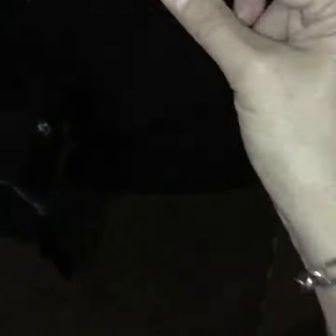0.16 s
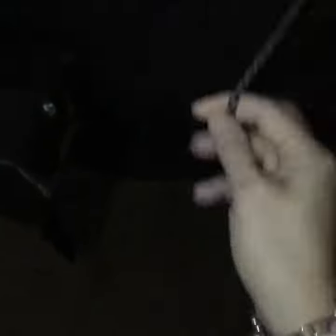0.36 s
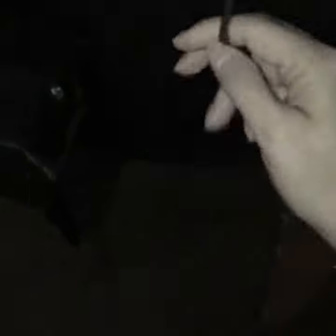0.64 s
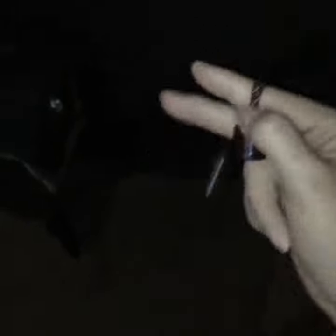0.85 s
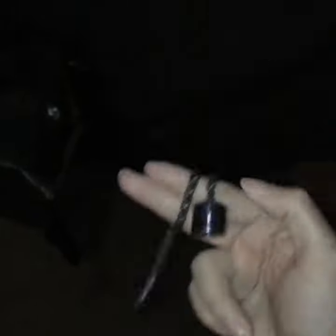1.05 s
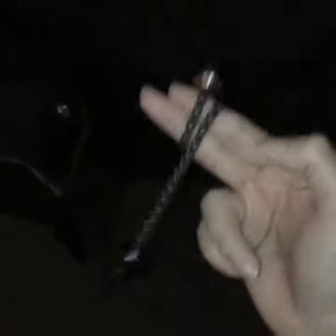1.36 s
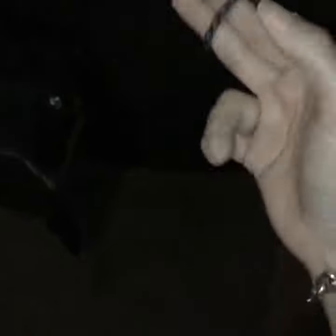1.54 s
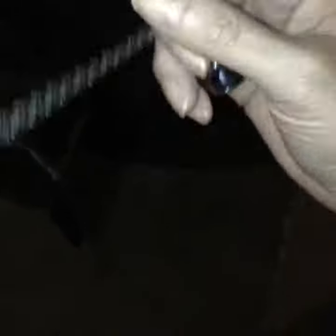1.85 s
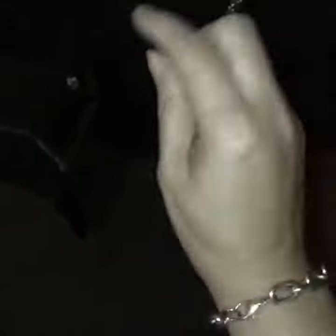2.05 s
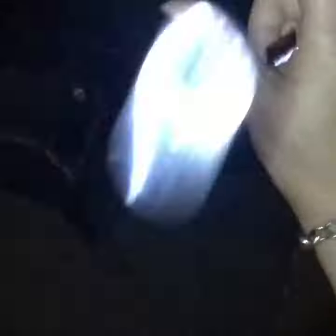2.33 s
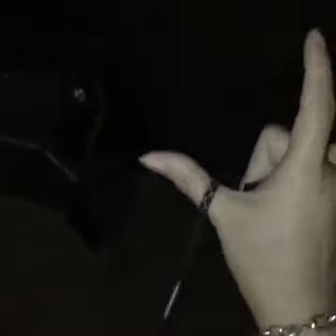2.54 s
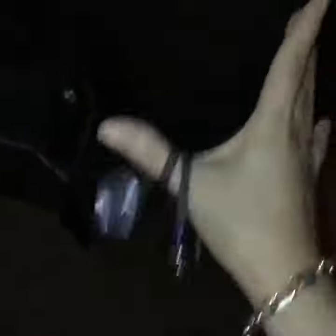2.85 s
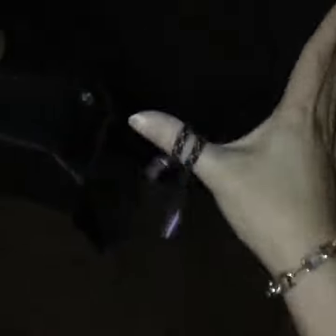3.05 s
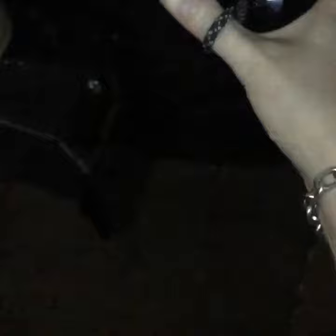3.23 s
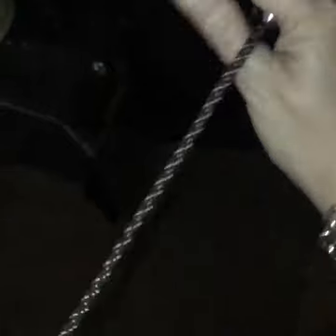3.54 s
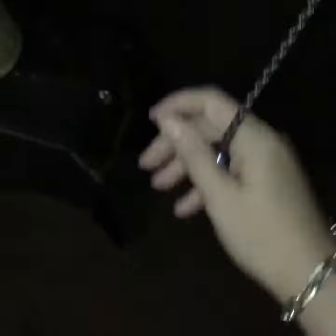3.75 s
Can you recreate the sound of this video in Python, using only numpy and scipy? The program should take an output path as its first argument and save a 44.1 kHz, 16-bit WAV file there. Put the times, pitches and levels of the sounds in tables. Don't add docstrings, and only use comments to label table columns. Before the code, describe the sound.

Two metal beads on a cord clack sharply once amid tiny ticks and rustles, fan droning

```python
import sys
import numpy as np
from scipy import signal
from scipy.fft import rfft, irfft, next_fast_len
from scipy.io import wavfile
from scipy.ndimage import uniform_filter1d

SR = 44100
rng = np.random.default_rng(int(sys.argv[2]) if len(sys.argv) > 2 else 0)


def linear_from_db(decibels):
    return 10 ** (np.asarray(decibels, float) / 20)


def generate_wav(sig):
    pcm = np.round(np.clip(np.atleast_2d(sig).T, -1, 1) * 32767).astype(np.int16)
    wavfile.write(sys.argv[1], SR, pcm)


N = 171549


def rms_one(x):
    return x / np.sqrt(np.mean(x ** 2) + 1e-20)


def butter(x, hz, kind, order=2):
    sos = signal.butter(order, np.clip(hz, 20, .45 * SR), kind, fs=SR, output="sos")
    return signal.sosfilt(sos, x)


def add(out, s, sound):
    i = max(int(s * SR), 0)
    out[i:i + len(sound)] += sound[:N - i]


def at_hz(points, hz):
    f, db = np.transpose(points)
    return np.interp(np.log(hz), np.log(f), db)


def shaped(power):
    size = next_fast_len(N)
    hz = np.arange(size // 2 + 1) * SR / size + 1e-3
    spectrum = rfft(rng.standard_normal(size))
    return irfft(spectrum * np.sqrt(power(hz) * SR / 2), size)[:N]


def wander(step_s, points, size):
    return np.interp(np.arange(size) / SR, np.arange(points) * step_s, rng.standard_normal(points))


# (frequency [Hz], level [dB per Hz])
RUSH = [(40, -108), (110, -81.5), (300, -70.5), (700, -83), (1500, -91), (2400, -91), (2700, -112),
        (3700, -136)]
# (frequency [Hz], level [dB per Hz])
AIR = [(2700, -112), (3300, -115), (3700, -118.5), (4200, -119), (6000, -123), (9600, -127), (12000, -131),
       (16000, -135)]
# (frequency [Hz], width [Hz], level [dB per Hz])
DRONES = [(60, 10, -89.5), (89.7, 6.9, -75), (163.9, 12, -61.5), (240.5, 14, -66.5), (272.6, 24, -62.5),
          (324, 18, -64), (484, 10, -75), (686, 34, -79), (2122.4, 46, -73), (2198, 150, -84.5),
          (2444, 67, -92), (2888, 102, -96), (3148, 170, -110)]
WHINES = [(828, 3.9, -81.5), (950, 15, -84), (1021, 18, -82.5), (1150, 14, -84), (1220, 20, -84),
          (1347, 10, -83.5), (1653, 36, -83.5), (2322, 14, -83)]
HIGH_WHINES = [(4580, 350, -116.5), (9650, 250, -122)]


def fan():
    sway_db, sway_step_s = 0.95, 1 / 8

    def power(hz):
        rush = linear_from_db(2 * at_hz([(11, -128)] + RUSH + [(6000, -150)], hz))
        air = linear_from_db(2 * at_hz(AIR, hz)) * (hz > 2000)
        peaks = sum(linear_from_db(2 * db) / (1 + (2 * (hz - f) / width) ** 2) ** 2
                    for f, width, db in DRONES + WHINES + HIGH_WHINES)
        return rush + air + peaks

    return shaped(power) * linear_from_db(sway_db * wander(sway_step_s, 40, N))


def swell(size):
    peak_share = .42
    ramp = np.interp(np.arange(size) / size, [0, peak_share, 1], [0, 1, 0])
    return np.sin(np.pi / 2 * ramp) ** 2


# (start [s], length [s], level [dB], pitch [Hz])
SWISHES = [(0.001, .2, -89.5, 5440), (1.166, 0.11, -76, 5320), (2.087, 0.052, -74.5, 6270),
           (2.092, 0.037, -78.5, 7800), (0.434, 0.057, -87.5, 5800), (1.523, 0.041, -85, 5100),
           (1.53, 0.032, -86.5, 7840), (1.856, 0.027, -85.5, 6740), (2.247, .03, -85, 7500),
           (2.288, 0.034, -83, 4180), (2.374, .045, -88, 4520), (2.898, 0.025, -86, 5800),
           (3.45, .03, -87.5, 7380), (3.52, .07, -91, 7800), (3.59, 0.035, -89, 4170),
           (3.704, .06, -86.5, 6000)]


def swishes(snag_gain):
    out, half_width_hz = np.zeros(N), 510 / 2
    air = rng.standard_normal(N + SR) * snag_gain
    for s, length, db, hz in SWISHES:
        i, n = int(s * SR), int(length * 1.3 * SR)
        band = butter(air[i:i + n], [hz - half_width_hz, hz + half_width_hz], "band")
        add(out, s - 0.14 * length, linear_from_db(db + 1.5) * swell(n) * rms_one(band))
    return out


def fibres(snag_gain):
    rate_per_s, spread_db, top_hz = 9600, 3, 19500
    tilt_db_per_band, weave_db, weave_s = 0.6, 3.0, 0.015
    size = N + SR
    caught = rng.random(size) < rate_per_s / SR
    height = linear_from_db(spread_db * np.minimum(rng.exponential(1, size), 5))
    clicks = caught * height * rng.choice([-1, 1], size)
    clicks = butter(clicks * snag_gain, top_hz, "low", order=1)
    edges, out = np.geomspace(3500, 19000, num=11), np.zeros(size)
    for k, (low, high) in enumerate(zip(edges, edges[1:])):
        weave = wander(weave_s, 600, size)
        band = butter(clicks, [low, high], "band", order=1)
        out += linear_from_db(tilt_db_per_band * k + weave_db * weave) * band
    return out


# (start [s], length [s], level [dB], lowest frequency [Hz])
SLIDES = [(0.228, .045, -74.5, 10500), (.295, .03, -78, 7000), (0.33, 0.052, -79.5, 9000),
          (.47, .14, -81, 12500), (0.685, 0.022, -75, 12600), (0.714, 0.034, -69, 8450),
          (1.077, .04, -80, 8000), (1.14, .125, -76, 9500), (1.111, 0.019, -60, 4200),
          (1.126, 0.031, -76, 6500), (1.35, 0.12, -71, 5000), (1.272, 0.026, -63.5, 4180),
          (1.437, 0.033, -74, 8000), (1.688, 0.039, -72, 11470), (1.714, .065, -72, 9000),
          (1.771, 0.047, -73.5, 8100), (1.794, 0.052, -65, 8500), (1.851, 0.027, -75, 7000),
          (1.902, .045, -65, 9100), (1.924, 0.048, -70, 8500), (2.063, 0.069, -72, 10500),
          (2.13, 0.073, -83, 9000), (2.244, 0.032, -76, 10000), (2.268, 0.043, -67.5, 10500),
          (2.33, 0.084, -81, 10500), (2.687, 0.029, -72, 10100), (2.712, 0.026, -70.5, 7000),
          (2.738, 0.034, -80, 8000), (2.778, .02, -75, 7000), (2.803, 0.025, -60.5, 5040),
          (2.83, 0.054, -83, 5500), (1.478, 0.027, -77.5, 9000), (2.923, 0.056, -67.5, 8000),
          (2.995, 0.051, -76, 10100), (3.053, 0.051, -79.5, 8000), (3.356, 0.047, -73.5, 10000),
          (3.39, 0.099, -84.5, 10050), (3.46, 0.07, -76.5, 11130), (3.54, .085, -71.5, 10030),
          (3.705, .05, -77.5, 11500), (3.773, 0.038, -77, 8500), (3.855, 0.064, -63.5, 10500),
          (.4, .07, -84, 13000)]


def slides(snag_gain):
    out, clicks = np.zeros(N), fibres(snag_gain)
    for s, length, db, low_hz in SLIDES:
        i, n = int(s * SR), int(length * 1.3 * SR)
        rustle = butter(clicks[i:i + n], low_hz, "high", order=5)
        add(out, s - .15 * length, linear_from_db(db + 0.3) * swell(n) * rms_one(rustle))
    return out


def cord():
    snag_db, snag_s = 2, 0.0071
    snag_gain = linear_from_db(snag_db * wander(snag_s, 1500, N + SR))
    return swishes(snag_gain) + slides(snag_gain)


def mode(hz, t60, t):
    return np.sin(2 * np.pi * hz * t) * linear_from_db(-60 * t / t60)


# (time [s], peak level [dB], pitch [Hz])
TICKS = [(.6942, -58, 14000), (.7279, -46, 11600), (.7319, -51, 12200), (1.1103, -49, 10200),
         (1.115, -47, 10500), (1.1171, -32, 10600), (1.1195, -43, 9500), (1.1215, -45, 11500),
         (1.1266, -48, 10100), (1.155, -58, 8500), (1.2868, -45, 8300), (1.2895, -45, 8600),
         (1.2971, -31, 10200), (1.302, -32, 8300), (1.3066, -35, 9000), (1.3105, -36, 8400),
         (1.3865, -49, 8500), (1.485, -64, 13000), (1.4915, -60, 12000), (1.3624, -46, 8600),
         (1.3652, -42, 8200), (1.4463, -52, 11700), (3.0301, -57, 14600), (1.7388, -49, 12100),
         (2.0677, -49, 12800), (2.0894, -57, 12100), (2.7254, -52, 12300), (2.7286, -45, 12800),
         (2.8028, -48, 10200), (2.8071, -47, 11100), (2.8155, -32, 11300), (2.8195, -48, 12500),
         (2.8225, -50, 11000), (3.0475, -65, 10000), (3.0735, -62, 11000), (2.9424, -47, 12800),
         (2.945, -49, 12700), (2.9554, -43, 12500), (2.9619, -44, 11400), (2.9655, -40, 12700),
         (3.5793, -54, 12500), (.2466, -64, 14500), (1.7013, -62, 13200), (1.859, -62, 11000),
         (1.915, -56, 11800), (2.693, -63, 11400), (2.929, -56, 12500), (3.3705, -64, 12200),
         (3.8655, -54, 14500)]


def ticks():
    cycles, low_ratio, low_db, boost_db = 10, .62, -9.5, 3
    chatter_db, chatter_t60_s = -17.5, .01
    out, t = np.zeros(N), np.arange(SR // 50) / SR
    for s, db, hz in TICKS:
        t60 = cycles / hz
        ping = mode(hz, t60, t) + linear_from_db(low_db) * mode(low_ratio * hz, t60, t)
        grit = rng.standard_normal(len(t)) * rng.exponential(1, len(t))
        grit = butter(grit, [0.64 * hz, 1.3 * hz], "band")
        chatter = linear_from_db(chatter_db - 60 * t / chatter_t60_s) * grit
        add(out, s, linear_from_db(db + boost_db) * butter(ping + chatter, .55 * hz, "high"))
    return out


# (frequency [Hz], level [dB], t60 [s])
BEAD = [(5600, -2, .0023), (6700, -2, .0026), (8700, -7, .0018), (11600, 3.5, .0025), (12500, 0, .003),
        (14600, -19, .004), (2600, -20, .005)]
# (time [s], peak level [dB], pitch [Hz], t60 [s])
REBOUND = (1.29675, -11, 8000, .0013)


def clack():
    clack_s, clack_db, contact_s = 1.29427, -7, .00014
    flip_hz = 10000
    out, t = np.zeros(N), np.arange(SR // 50) / SR
    press = np.clip(t / contact_s, 0, 1)
    ring = sum(np.sign(flip_hz - hz) * linear_from_db(db) * mode(hz, t60, t) for hz, db, t60 in BEAD)
    add(out, clack_s, linear_from_db(clack_db) * ring / 2 * press)
    s, db, hz, t60 = REBOUND
    add(out, s, linear_from_db(db) * mode(hz, t60, t) * press)
    return out


def room(x):
    level_db, t60_s, delay_s = -34.5, .225, 0.0044
    low_hz, dull_hz, treble_db, peak_hz, peak_db = 4000, 9500, -13, 8200, 0
    t = np.arange(SR // 3) / SR
    noise = butter(rng.standard_normal(len(t)), low_hz, "high")
    dull = butter(noise, dull_hz, "low", order=4)
    peak = butter(noise, [.85 * peak_hz, 1.1 * peak_hz], "band")
    tail = (dull + linear_from_db(treble_db) * noise + linear_from_db(peak_db) * peak) * linear_from_db(-60 * t / t60_s)
    return linear_from_db(level_db) * signal.fftconvolve(x, tail * np.clip(t / delay_s, 0, 1))[:N]


def scene():
    drone, rustle = fan(), cord()
    hits = butter(ticks() + clack(), 3400, "high")
    return (drone + rustle + hits + room(hits + .5 * rustle))[None]


CUTOFF_HZ = 16900
# (frequency [Hz], level [dB per Hz])
GATE = [(2400, -125), (2800, -107), (3300, -112), (3700, -114), (5000, -116), (8000, -118), (11000, -122),
        (16000, -126)]


def suppress(x):
    soft_db, depth_db, wobble_db, patch_db, patch_fade_db = 1.0, -30, 2.5, 4, 10
    top_hz, top_loss_db = 15900, -27
    window = np.sin(np.pi * (np.arange(2048) + .5) / 2048)
    hz, _, cells = signal.stft(x, SR, window, nperseg=2048, noverlap=1024, scaling="psd")
    band = (20 * np.log(1 + hz / 400)).astype(int)
    wobble, patch = rng.standard_normal((2, 100, cells.shape[1]))[:, band]
    power = 2 * uniform_filter1d(np.abs(cells) ** 2, size=4, axis=0)
    over_db = 10 * np.log10(power + 1e-30) - at_hz(GATE, hz + 1)[:, None]
    top = hz > top_hz
    over_db[top] = over_db[top & (hz < CUTOFF_HZ)].mean(axis=0) + top_loss_db
    wobble[top] = 0
    closed = .5 - 0.47 * np.tanh((over_db + wobble_db * wobble) / soft_db)
    uneven_db = patch_db * patch * np.exp(-(over_db / patch_fade_db) ** 2)
    keep = linear_from_db(depth_db * closed + uneven_db)
    keep[hz < GATE[0][0]] = 1
    return signal.istft(cells * keep, SR, window, nperseg=2048, noverlap=1024, scaling="psd")[1][:N]


def band_limit(x):
    return signal.sosfilt(signal.butter(12, 16840, fs=SR, output="sos"), x)


# (frequency [Hz], level [dB per Hz])
RESIDUE = [(2000, -128), (3700, -136), (5000, -133), (10000, -134.5), (13000, -138), (16000, -143)]


def record(dry):
    residue = shaped(lambda hz: linear_from_db(2 * at_hz(RESIDUE, hz)))
    top_cut = signal.cheby2(10, 50, CUTOFF_HZ, fs=SR, output="sos")
    cut = signal.sosfilt(top_cut, suppress(dry[0]))
    return band_limit((cut + residue)[None])


dry = scene()
out = record(dry)
generate_wav(out)
```